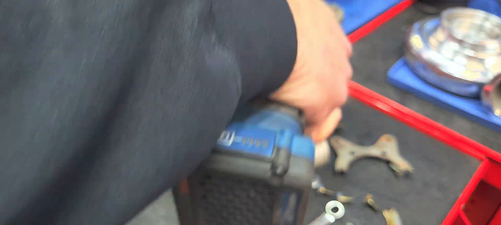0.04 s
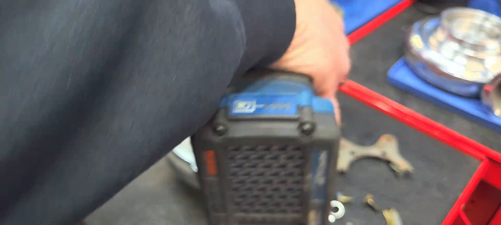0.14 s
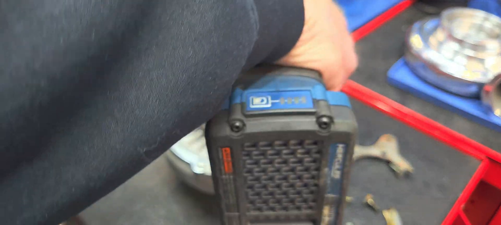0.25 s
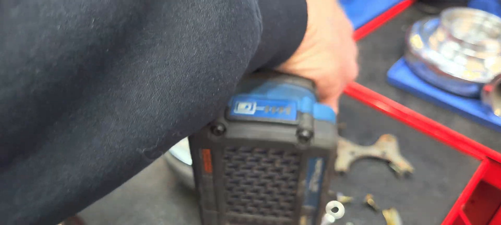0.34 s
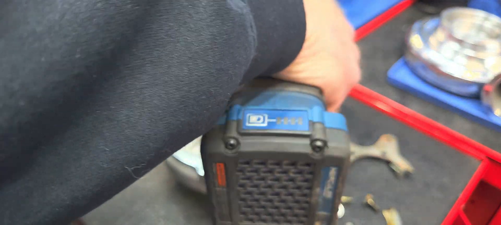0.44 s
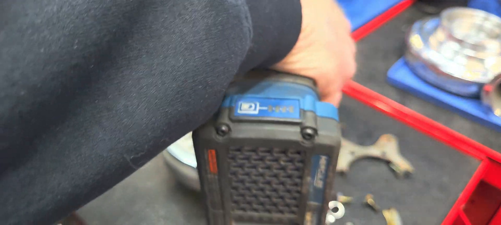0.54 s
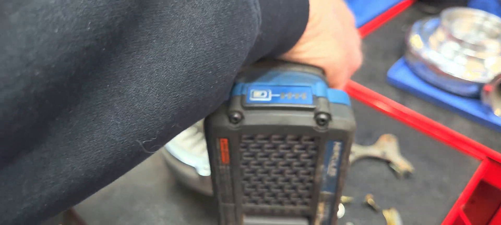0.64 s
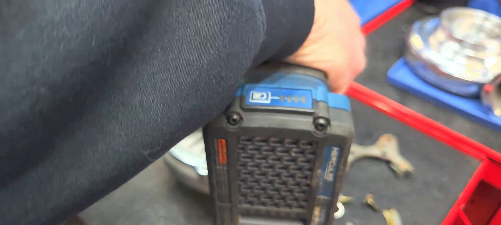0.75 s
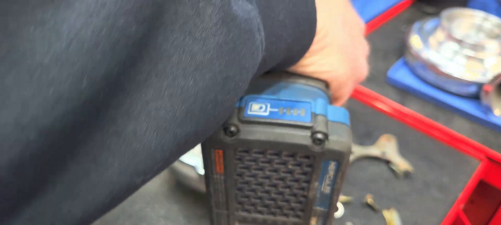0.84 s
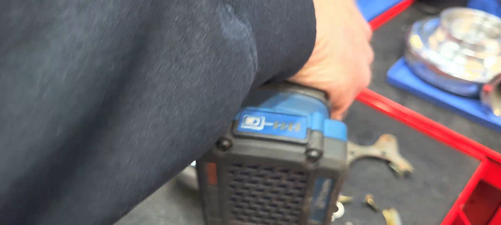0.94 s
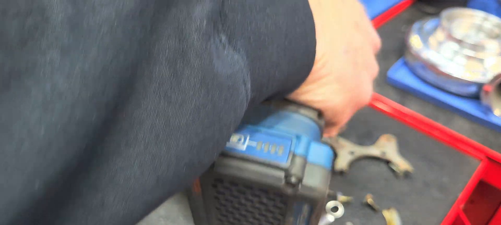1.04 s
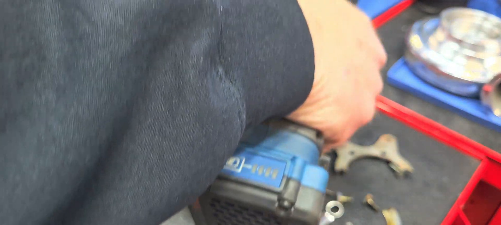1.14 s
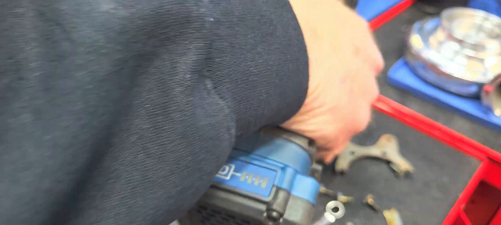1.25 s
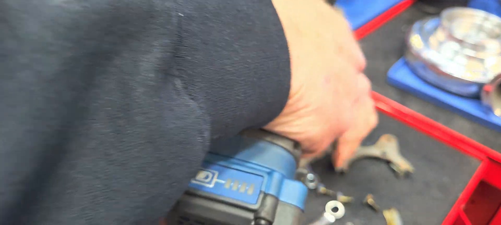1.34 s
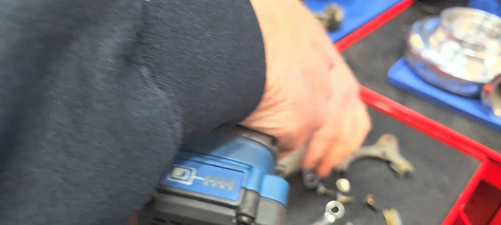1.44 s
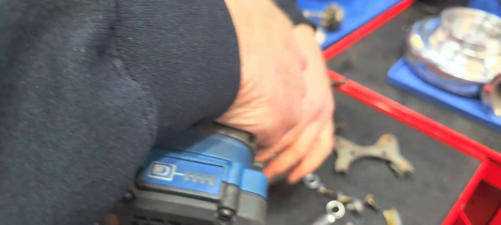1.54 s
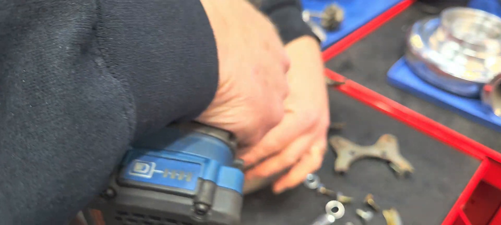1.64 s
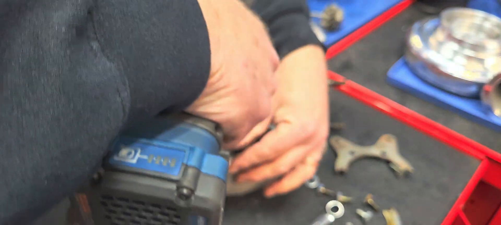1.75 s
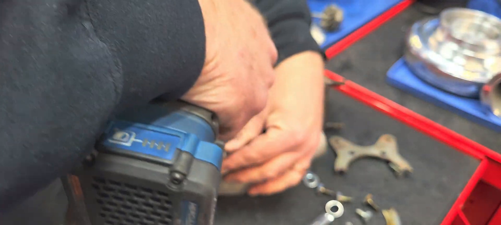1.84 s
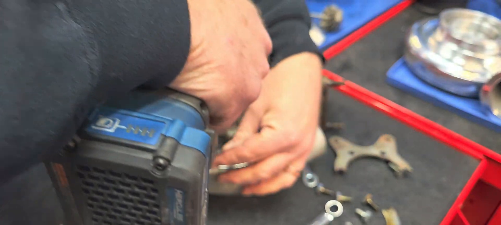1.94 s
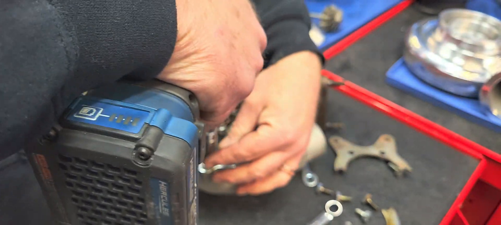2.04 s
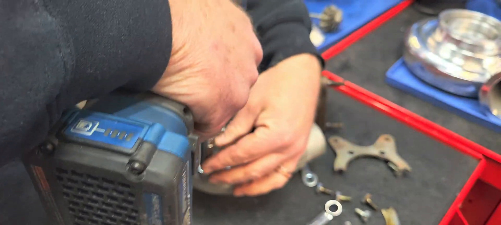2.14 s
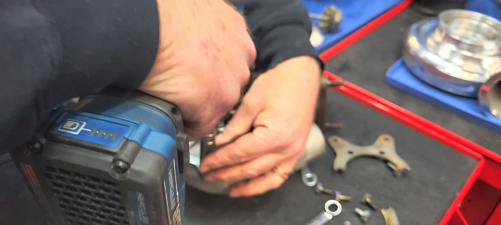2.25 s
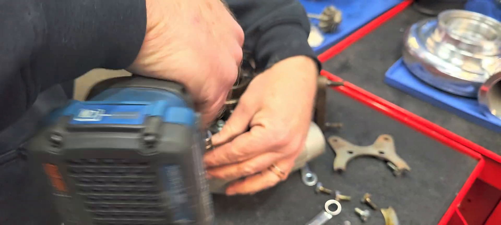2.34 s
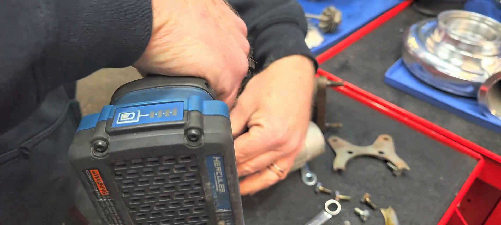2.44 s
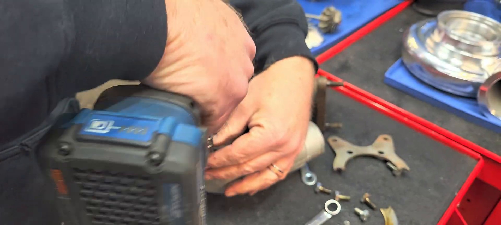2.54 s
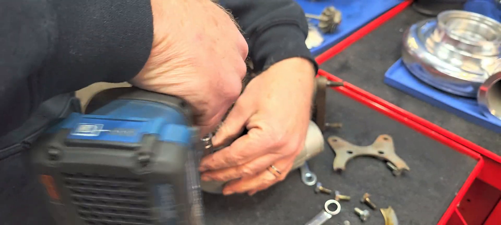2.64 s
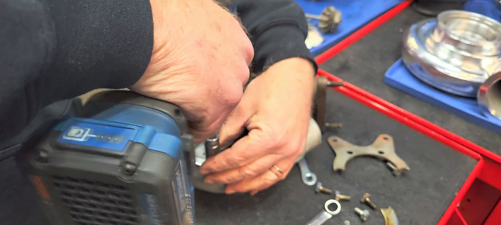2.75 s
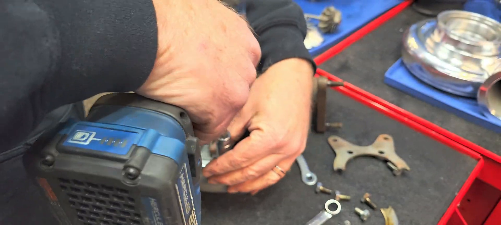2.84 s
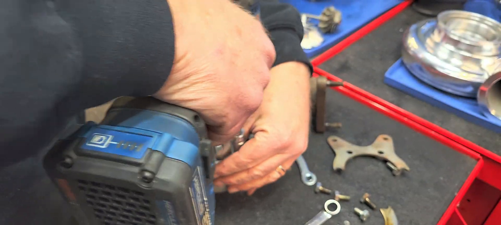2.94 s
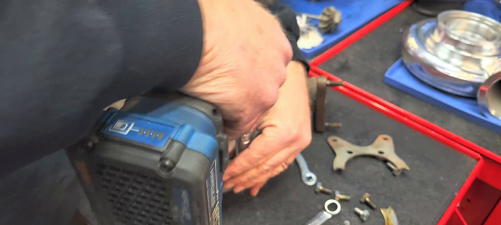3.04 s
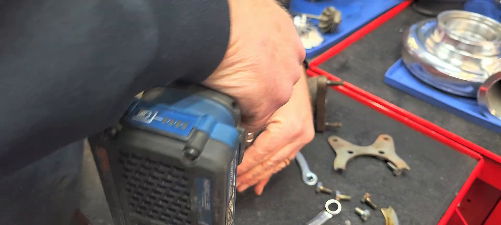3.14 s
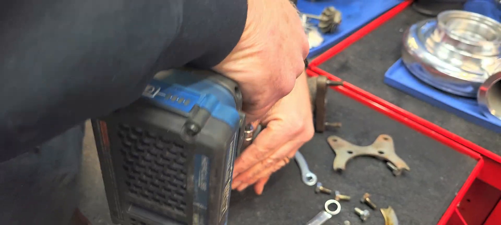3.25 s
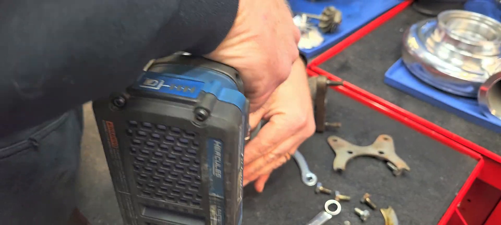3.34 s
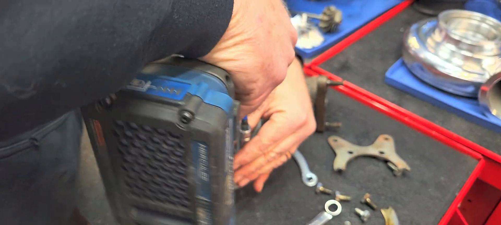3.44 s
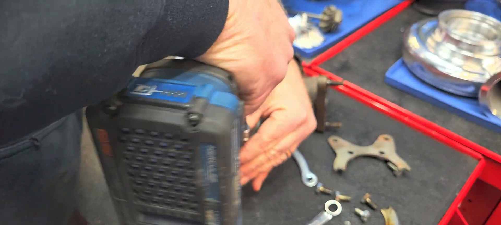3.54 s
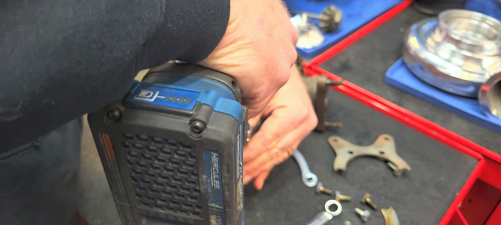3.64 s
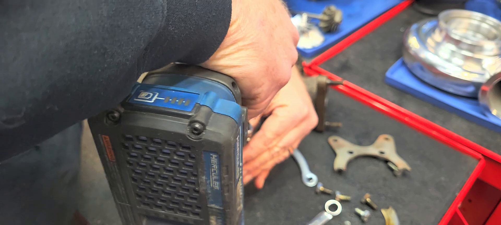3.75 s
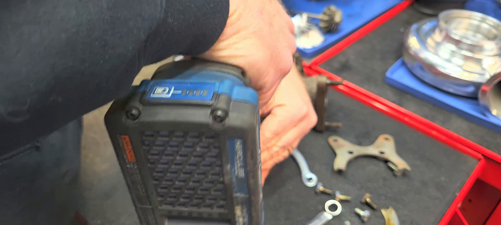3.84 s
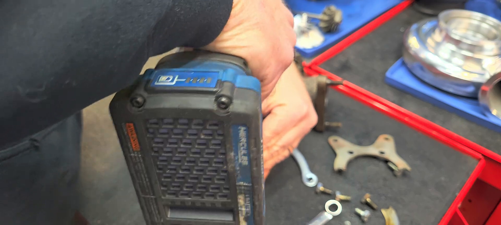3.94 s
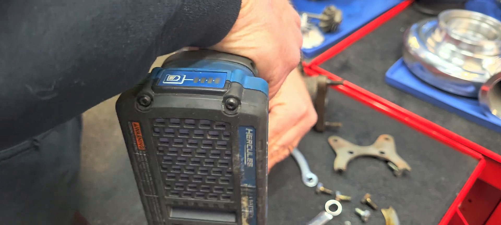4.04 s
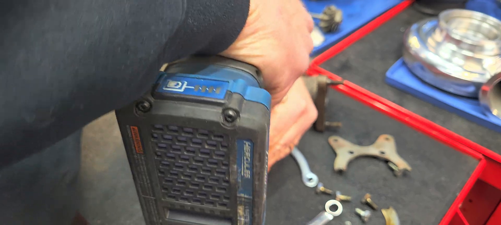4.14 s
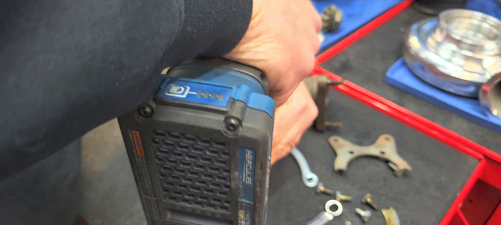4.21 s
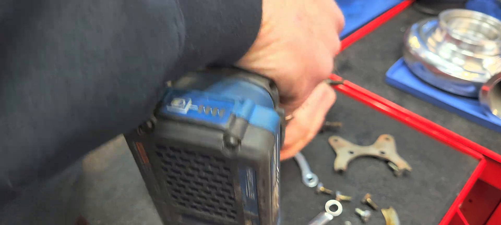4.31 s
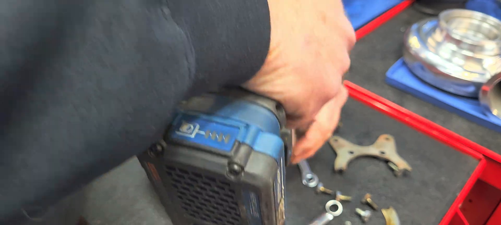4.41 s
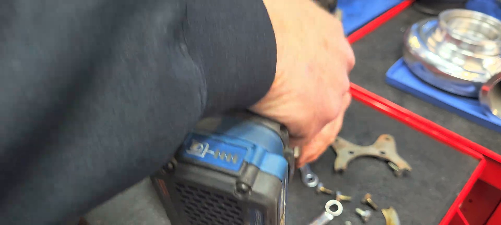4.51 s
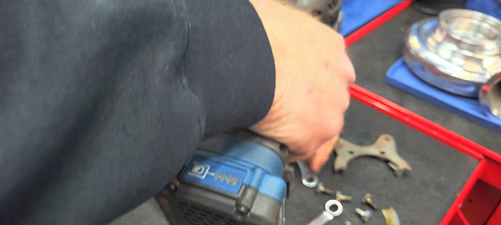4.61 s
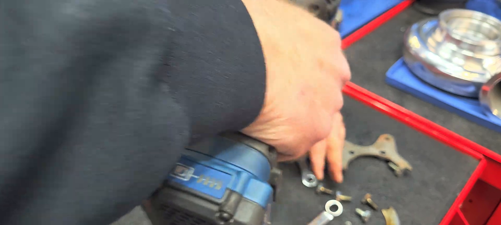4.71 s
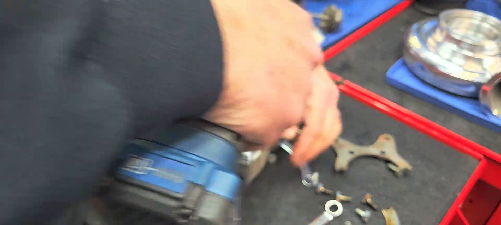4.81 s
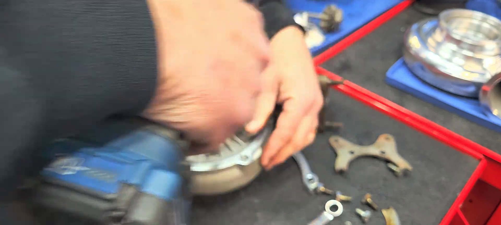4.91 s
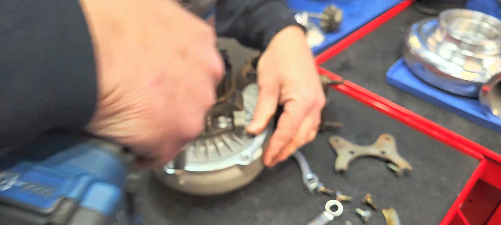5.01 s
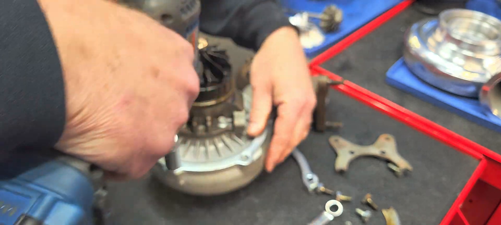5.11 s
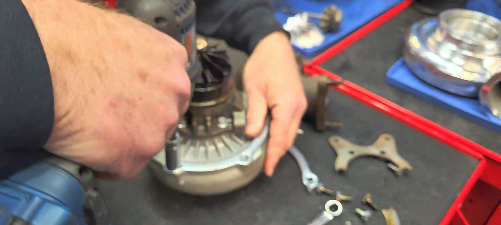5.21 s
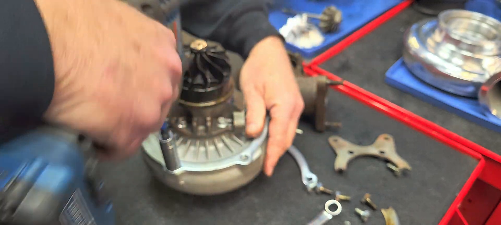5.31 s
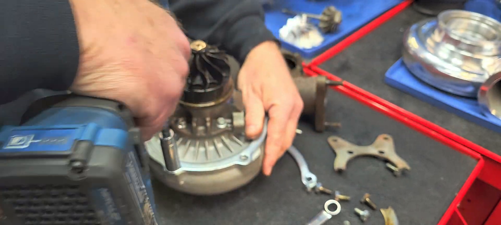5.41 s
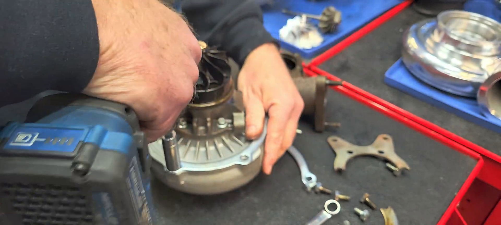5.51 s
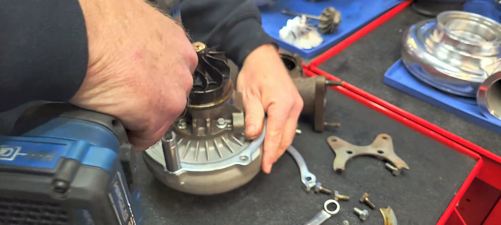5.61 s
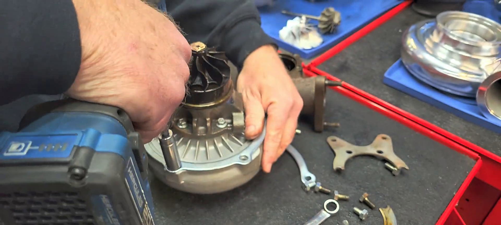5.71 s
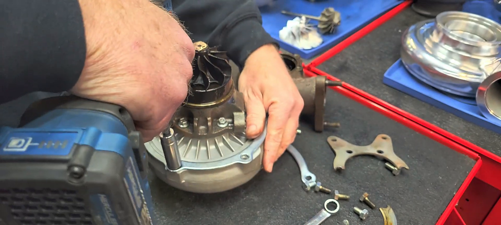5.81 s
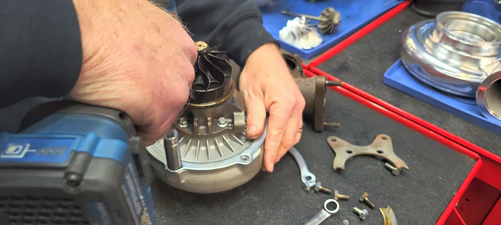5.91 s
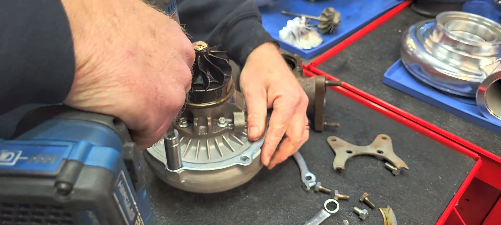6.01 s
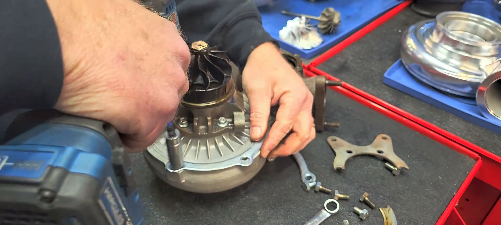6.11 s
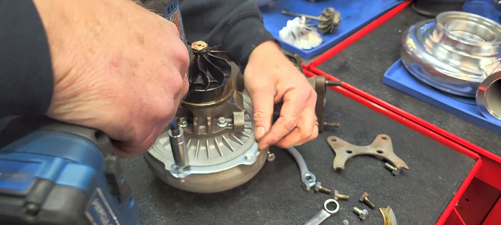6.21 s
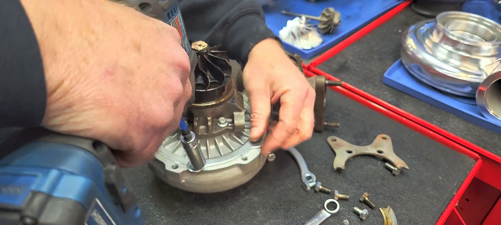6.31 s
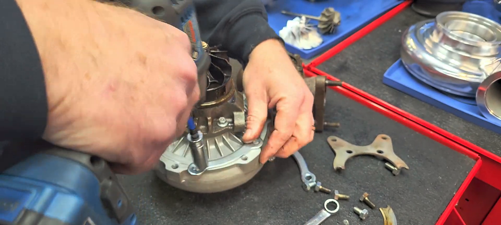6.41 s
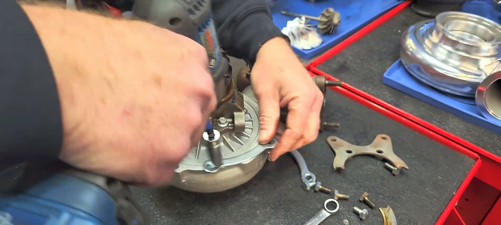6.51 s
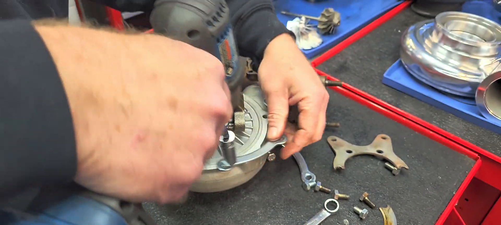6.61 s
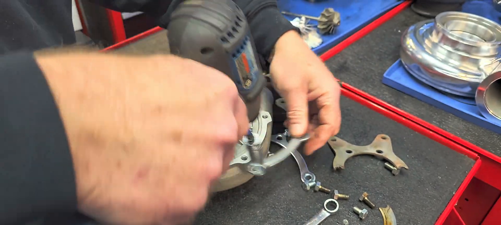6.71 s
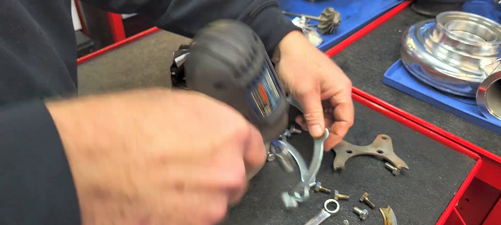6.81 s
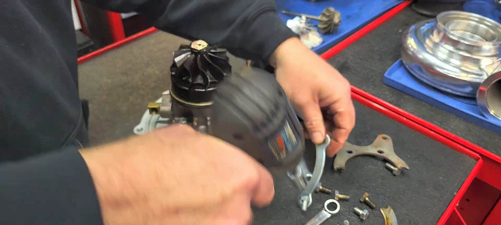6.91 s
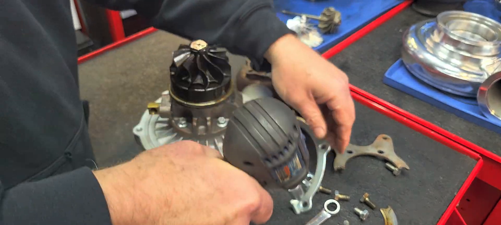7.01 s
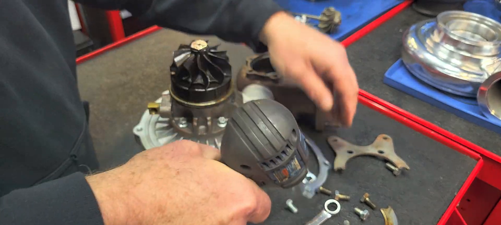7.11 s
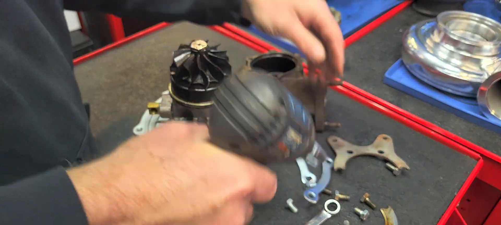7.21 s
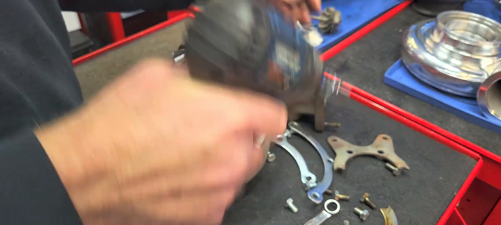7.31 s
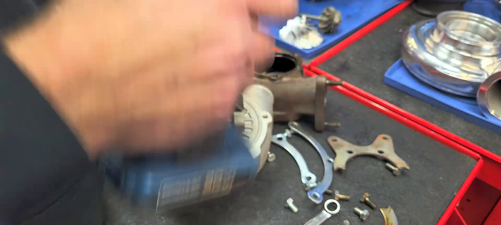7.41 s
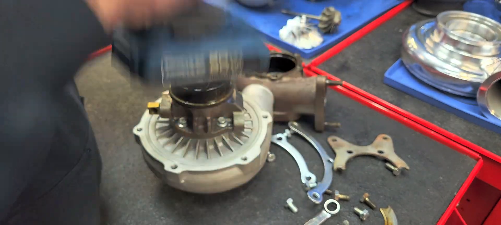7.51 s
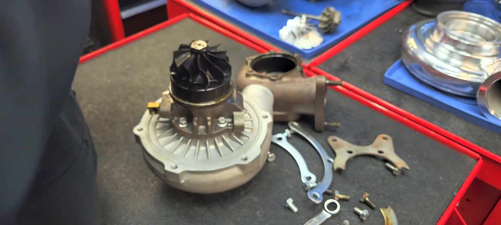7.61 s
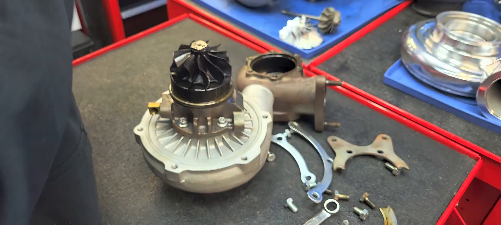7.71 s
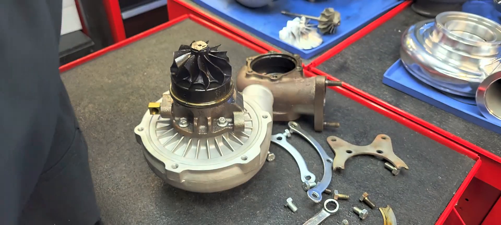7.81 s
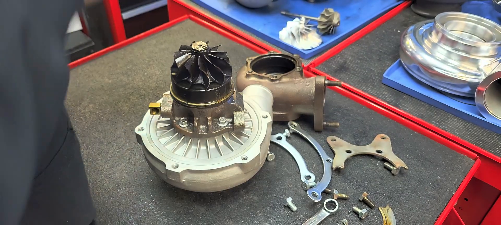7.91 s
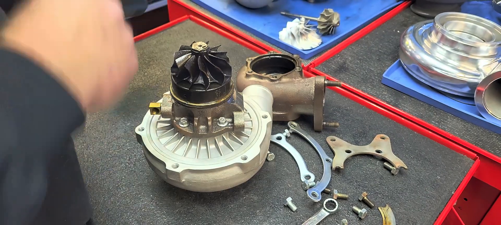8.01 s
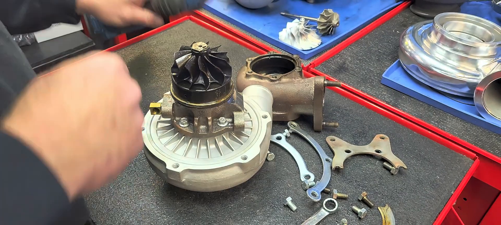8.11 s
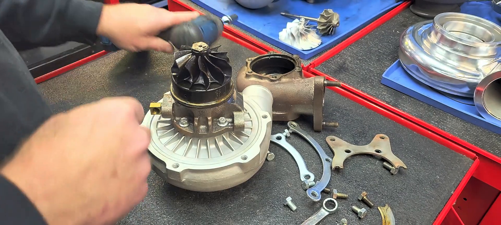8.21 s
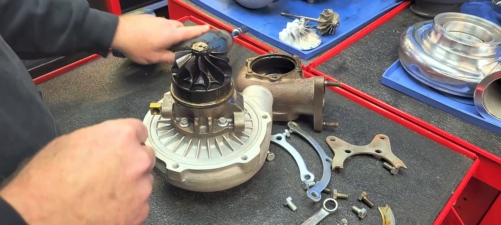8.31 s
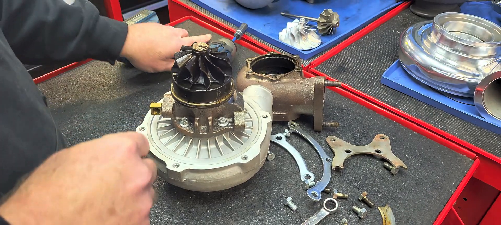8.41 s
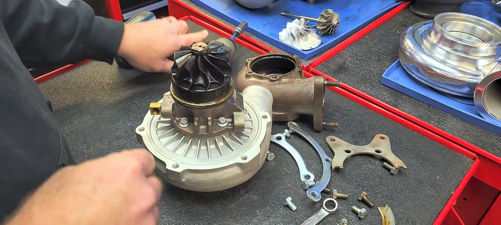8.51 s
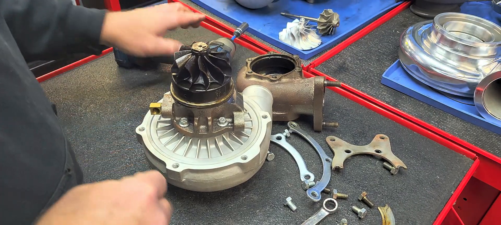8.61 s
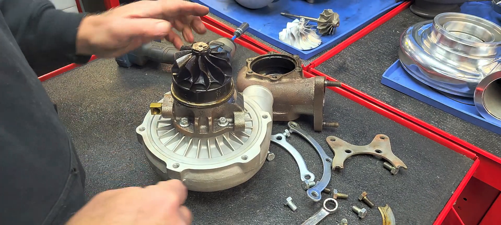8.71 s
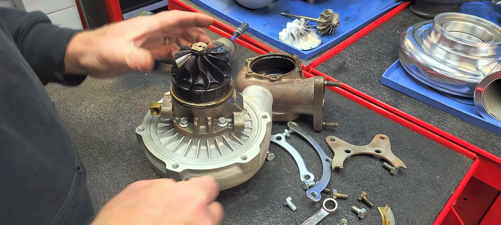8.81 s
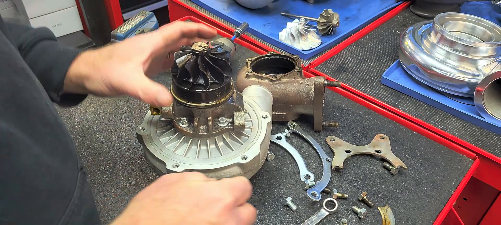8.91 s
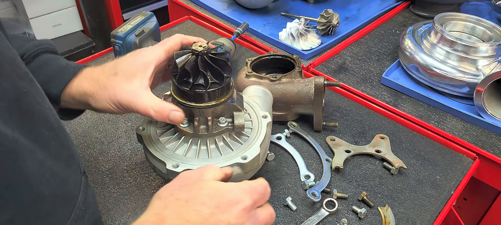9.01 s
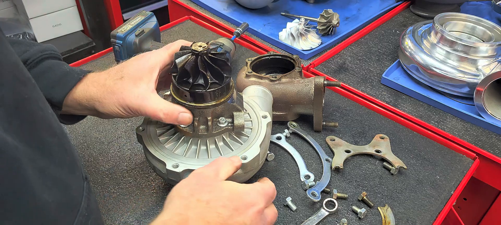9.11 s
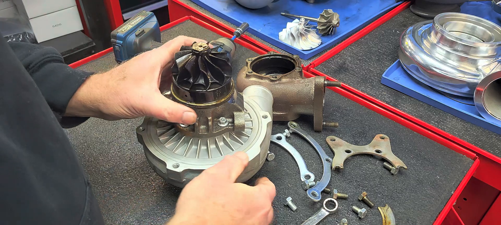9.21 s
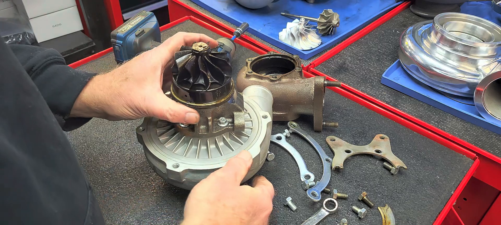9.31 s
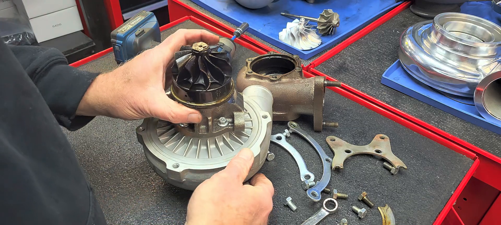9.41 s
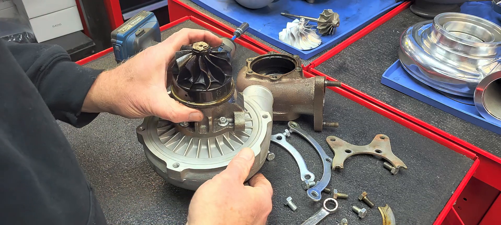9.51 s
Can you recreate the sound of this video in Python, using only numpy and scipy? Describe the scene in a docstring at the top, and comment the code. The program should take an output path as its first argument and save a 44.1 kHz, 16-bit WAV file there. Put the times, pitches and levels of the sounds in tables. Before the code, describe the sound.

Close stereo pickup at a padded workbench, with low humming workshop air and a short diffuse echo. At 0 s thin steel ticks and a thump, then at about 0.3 s a very short impact-wrench clatter; the motor whirs free until 0.9 s. From 1.1 to 2.6 s there are sparse clicks and knocks of socket on casting, sharper near 2.4 and 2.65. A sustained rattle of hard rapid blows runs 2.7-3.15, another 3.45-3.8 with the motor racing on to 4.2. Around 4.8-5 s a thump, plate clink and scuff, then small knocks. The last brief hammering comes at 5.6, spinning free until 6.3, as a second plate clinks and hisses. Bright plate jingles and padded thumps cluster at 6.9-7.3. Quiet follows, then faint ticks, a knock and scrape at 8.35 as the tool is laid down, soft thumps to 8.6, a low rumble near 9.1, and room air.

```python
"""Impact wrench on a padded bench

In a quiet workshop, close to a phone with two microphone ports, a cordless impact wrench backs bolts
out of a cast housing. Bursts of short steel blows work each bolt loose; gear, fan and shaft noise follow the trigger.
Around the bursts, filtered contacts click, knock, scuff and thump, and thin clamp plates ring as sums of modes,
the tool is laid down, and a short diffuse echo and humming shop air lie behind."""
import sys
import numpy as np
from scipy import signal
from scipy.fft import rfft, irfft, next_fast_len
from scipy.io import wavfile
from scipy.ndimage import uniform_filter1d

SR = 44100
rng = np.random.default_rng(int(sys.argv[2]) if len(sys.argv) > 2 else 0)


def transcribe(signal):
    """Save signal, clipped to [-1, 1], as a 16-bit WAV file at the path in sys.argv[1]."""
    frames = np.atleast_2d(signal).T
    limited = np.clip(frames, -1, 1)
    pcm = np.round(limited * 32767).astype(np.int16)
    wavfile.write(sys.argv[1], SR, pcm)


N = 421155  # length [samples]


def undb(db):
    """Decibels to gain."""
    return 10 ** (np.asarray(db) / 20)


def shape(x, table, share=1):
    """Colour a sound by a share of (frequency [Hz], level [dB]) points, straight over log frequency."""
    hz, db = np.transpose(table)
    size = next_fast_len(x.shape[-1])
    f = np.maximum(np.arange(size // 2 + 1) * SR / size, 1)
    gain = undb(share * np.interp(np.log(f), np.log(hz), db))
    return irfft(rfft(x, size) * gain, size)[..., :x.shape[-1]]


def unit(x):
    """Scale to rms 1."""
    return x / np.sqrt(np.mean(x ** 2))


def walk(rate):
    """Random levels held 1 / rate s and slewed twice."""
    hold = int(SR / rate)
    steps = np.repeat(rng.standard_normal(N // hold + 1), hold)
    return uniform_filter1d(uniform_filter1d(steps, hold), hold)[:N]


def pair(alike, size=N):
    """Two noises, left and right, that share a part of their power."""
    mid, left, right = rng.standard_normal((3, size))
    alike = np.clip(alike, 0, 1)
    return np.sqrt(alike) * mid + np.sqrt(1 - alike) * np.array([left, right])


def add(out, s, sound, db, pan_db):
    """Lay a two-channel sound in at s, scaled by the peak of its centre or half its louder side's peak."""
    i = int(s * SR)
    peak = max(np.abs(sound.mean(axis=0)).max(), .5 * np.abs(sound).max())
    sound = sound[:, :N - i] * undb(db) / peak
    out[:, i:i + sound.shape[1]] += sound * undb(np.array([[pan_db], [-pan_db]]) / 2)


def ring(modes, scatter_db, detune, push_s):
    """One blow on a body: each decaying mode gets its own strength and tuning."""
    hz, db, t60 = np.transpose(modes)[:, :, None]
    t = np.arange(int(SR * t60.max())) / SR
    strength, offset, start, lag = rng.standard_normal((4, len(hz), 1))
    size = undb(db + scatter_db * strength - 60 * t / t60) * (1 - np.exp(-t / push_s))
    phase = 2 * np.pi * hz * (1 + detune * offset) * t + start
    # the ports hear a mode out of step, more so toward 2 kHz
    step = lag * np.minimum(hz / 2000, 1) ** 0.32
    left = (size * np.sin(phase + step)).sum(axis=0)
    right = (size * np.sin(phase - step)).sum(axis=0)
    return np.array([left, right])


def burst(t60, rise_s, alike):
    """A fast-fading noise spray of tiny contacts."""
    t = np.arange(int(SR * t60)) / SR
    return pair(alike, size=len(t)) * undb(-60 * t / t60) * (1 - np.exp(-t / rise_s)) ** 2


def crack(lo_hz, t60, rise_s):
    """A bright scrape or tick: a noise burst above lo_hz."""
    highpass = signal.butter(4, lo_hz, "high", fs=SR, output="sos")
    return signal.sosfilt(highpass, burst(t60, rise_s, .5))


SWELL_DB = -20  # level one rise before or one fall after the loudest moment [dB]


def swell(s, rise_s, fall_s, db):
    """Gain that climbs to db at s and dies away, straight in dB."""
    t = np.arange(N) / SR - s
    return undb(np.maximum(db + SWELL_DB * np.maximum(-t / rise_s, t / fall_s), -200))


# Colour of the workshop air: (frequency [Hz], density before scaling to rms 1 [dB])
SHOP_AIR = [(35, -28.5), (60, 2.5), (287, -20.5), (346, -26.5), (469, -37.5), (682, -32), (767, -38),
            (862, -33.5), (2650, -43.5), (6000, -56.5), (13000, -62), (16000, -68)]
# Distant machinery, before a 1 dB lift and wavering: (frequency [Hz], level [dB])
MACHINERY_HUM = [(344.5, -81), (414.5, -87), (516.8, -85), (689.1, -82), (861.3, -87), (1319, -91.5)]
# Hands and the tool jolting the phone's support: (loudest time [s], rise [s], fall [s], rumble level [dB])
JOLTS = [(7.4, .12, 0.38, -47), (8.62, 0.11, .35, -45.5), (9.09, 0.044, 0.34, -46.5)]
SHOP_AIR_DB = -57
RUMBLE_DB, RUMBLE_UNDER_SHAKE_DB, BOOM_DB = -67, -8.5, -63.5


def shop():
    """Wavering air, hum and bench boom; slow rumble rises while the tool is loaded or hands jolt the support."""
    t = np.arange(N) / SR
    air = unit(shape(pair(0.67), SHOP_AIR)) * undb(SHOP_AIR_DB + 1.5 * walk(6.7))
    *_, load, shake_db = trigger()
    hum = 0
    for hz, db in MACHINERY_HUM:
        hum = hum + undb(db + 1.0 + 3.5 * walk(15)) * np.sin(2 * np.pi * hz * t)
    low_band = signal.butter(2, [22, 58], "band", fs=SR, output="sos")
    rumble = unit(signal.sosfilt(low_band, pair(1.0)))
    jolted = sum(swell(*jolt) for jolt in JOLTS)
    shaken = undb(RUMBLE_DB) + load * undb(shake_db + RUMBLE_UNDER_SHAKE_DB) + jolted
    # the bench modes, here as a noise colour with sloping ends
    boom_colour = [(49.3, -18.5)] + [(hz, db) for hz, db, _ in BENCH_MODES] + [(820, -36)]
    boom = unit(shape(pair(.85), boom_colour)) * undb(BOOM_DB + 4.4 * walk(8.6))
    return air + hum + rumble * shaken + boom


# Clamp plates touching steel, the first and then the second plate:
# (time [s], reference level [dB], left minus right [dB], low modes relative to the reference before a 6 dB cut [dB])
FIRST_PLATE_HITS = [(0.0, -19.5, -6.5, -6.5), (0.0174, -12, -17, -9), (0.0585, -12.5, -5.5, -11.5),
                    (4.8372, -16.5, -7, -16), (4.8597, -29, -29, -30), (4.9828, -24.5, 0, -16)]
SECOND_PLATE_HITS = [(6.1938, -19, 9, -1), (6.2494, -19.5, 19, -2), (6.314, -14.5, 1, -7),
                     (6.465, -38, 2, -16), (6.647, -46, 0, 6), (6.72, -39, 2, -3),
                     (6.9396, -31, -14, -20.5), (6.9498, -23.5, 2.5, -12), (6.9644, -37.5, -8, -13),
                     (7.013, -14.5, -2, -15), (7.1104, -27, -12, -19.5), (7.1197, -14, -5, -17),
                     (7.1346, -16, 10.5, -10), (7.1643, -11.5, -17.5, -21), (7.1994, -20.5, -12, -14.5),
                     (7.2704, -8.5, -2.5, -27.5), (7.2994, -43, -19, -24)]
# Bending modes of each plate: (frequency [Hz], relative level [dB], time to fall 60 dB [s])
FIRST_PLATE_MODES = [(3985, -33, .12), (4630, -32, .11), (5490, -30, .12), (6196, -33, .1),
                     (7205, -19, .16), (8000, -30, .16), (9515, -10, .13), (10060, -26, .18),
                     (11720, -20, .15), (12020, 0, .13), (12220, -11, .14), (13590, -30, .12),
                     (14985, -11, .15), (15295, -6, .12)]
SECOND_PLATE_MODES = [(2750, -38, .17), (3450, -39, .12), (4425, -30, .12), (5405, -31, .12),
                      (7047, -23, .12), (7994, -38, .12), (9351, -10, .13), (9900, -28, .12),
                      (11780, 0, .12), (11830, -12, .2), (12220, -12, .1), (12550, -25, .1),
                      (13570, -38, .15), (14860, -14, .2), (15180, -16, .14)]


def plates():
    """Thin steel plates tick and ring; where they are struck sets how much the low bending modes sound."""
    out = np.zeros((2, N))
    for hits, table in ((FIRST_PLATE_HITS, FIRST_PLATE_MODES), (SECOND_PLATE_HITS, SECOND_PLATE_MODES)):
        modes = np.array(table)
        low = modes[:, 0] < 8500
        for s, db, pan_db, low_db in hits:
            add(out, s, ring(modes[~low], 3, .0008, .001), db - 3, pan_db)
            add(out, s, ring(modes[low], 3, .002, .0005), db + low_db - 6, pan_db / 2)
            add(out, s, crack(2400, 0.007, 0.00019), db - 12.5, pan_db)
    return out


# Trigger clicks, and socket and parts knocking on housing and bench: (time [s], body peak [dB],
# note over body [dB], treble over body [dB], thump over body [dB], note [Hz])
CLICKS_AND_KNOCKS = [(0.008, -29, -8.5, 12.5, -4.5, 5450), (0.054, -27.5, -4, -3, 2.5, 5440),
                     (0.19, -47.5, 0.5, 2, -7.5, 3190), (0.272, -39, -0.5, -9, -10.5, 5260),
                     (1.122, -47.5, -8, -6, -21, 3030), (1.142, -52, -6, -24, -16, 3020),
                     (1.396, -54.5, 17, -10, -11, 4350), (1.471, -28.5, -43, -47, 0.5, 2900),
                     (1.501, -46, -23, 8, 13.5, 4680), (1.617, -30.5, 4.5, -22, -10, 4030),
                     (1.641, -39, -2, 3, -8, 4420), (1.715, -27, 0.5, -1, -17, 4220),
                     (1.976, -38, -5, -16.5, -23, 4430), (2.13, -37, 2, -18.5, -11, 4160),
                     (2.151, -36.5, 0, -0.5, -3.5, 3690), (2.344, -36, 0, -5, -13, 2940),
                     (2.368, -20, 4.5, -6, -18.5, 3980), (2.533, -36.5, -1, 0.5, -12.5, 3110),
                     (2.646, -21.5, 0.5, -6, -16, 3200), (3.459, -25, -1.5, 7, -9, 3290),
                     (4.218, -31, -5.5, 14, -10, 3097), (4.769, -37.5, -15, -9, 13, 3120),
                     (4.853, -40.5, -17, 4, 2, 4000), (5.133, -29, 1, -26, -22, 3340),
                     (5.165, -30, -15, -21, -21, 3380), (5.175, -37, 6.5, -2, -13.5, 3350),
                     (5.209, -26.5, 2.5, -24, -16.5, 3560), (5.346, -45.5, -4, -16, -7.5, 4780),
                     (5.435, -40.5, -11, -16, -12.5, 3560), (5.453, -33.5, -9, -1, -18.5, 3460),
                     (5.461, -36.5, 1, -4, -4.5, 3376), (5.55, -28.5, -2, -3.5, -22, 3300),
                     (6.227, -34.5, 3, 22, -24, 3400), (6.463, -51, 4, 0, -17, 3430),
                     (6.513, -47, 13, -9, -16, 4480), (6.645, -46, 11, 18, -17, 4950),
                     (6.72, -49.5, 9.5, 20, -20, 3423), (6.742, -48, 1, 1, -13, 5330),
                     (6.771, -57, 15.5, 20, -5, 5300), (6.895, -33, -42, -36, 4, 2970),
                     (7.112, -39, 2, 22.5, 8.5, 4422), (7.134, -31, -8.5, 16.5, 4.5, 5500),
                     (7.801, -52, -5.5, -6, -1.5, 4410), (7.875, -43, -2.5, 5.5, -20.5, 4260),
                     (7.935, -50.5, -1, 6, -16, 4570), (8.205, -51, -22, -13, -10.5, 3100),
                     (8.254, -36, -6, -1.5, 7, 3100), (8.345, -27, 10.5, 3, -9, 3540),
                     (8.509, -36.5, -6, -7, -2, 3180)]
# Body of the casting: (frequency [Hz], relative level [dB])
HOUSING = [(250, -23), (600, -14), (1000, -2), (1280, 5), (1600, -0.5), (2300, -9), (4000, -32.5)]
# A part thudding on the padded top: (frequency [Hz], relative level [dB], time to fall 60 dB [s])
THUD_MODES = [(90, -3, 0.13), (162, -3, 0.2), (208, -8, 0.096), (273, -5.5, 0.062), (336, -0.5, 0.028),
              (413, -3, 0.0089), (475, -4, 0.033), (660, -8, 0.031)]
KNOCK_PAN_DB = 1.5  # left minus right
TICK_DB = -7.5  # broad tick under the note


def clicks_and_knocks():
    """The trigger clicks, socket and parts knock: a short clack, one broad note, bright ticks and a thud."""
    out, pan_db = np.zeros((2, N)), KNOCK_PAN_DB
    for s, db, high_db, top_db, thump_db, note_hz in CLICKS_AND_KNOCKS:
        resonance = signal.iirpeak(note_hz, 7.5, fs=SR)
        note = signal.lfilter(*resonance, burst(.02, .0002, .6))
        body = shape(burst(.018, .0003, .7), HOUSING)
        add(out, s, body, db, pan_db)
        add(out, s, note, db + high_db, pan_db)
        add(out, s, crack(1700, 0.0024, 0.0006), db + high_db + TICK_DB, pan_db)
        add(out, s, crack(7000, 0.038, 0.00013), db + top_db, pan_db)
        add(out, s, ring(THUD_MODES, 3, .05, .0015), db + thump_db, 0)
    return out


# Soft weight settling on the padded top: (time [s], peak [dB])
THUMPS = [(0.014, -31.5), (1.474, -38), (4.771, -30.5), (4.8, -33), (6.897, -34), (7.167, -29),
          (7.208, -32.5), (7.266, -28.5), (8.284, -33), (8.472, -32), (8.509, -36.5), (8.558, -35)]
# Bench: (frequency [Hz], relative level [dB], time to fall 60 dB [s])
BENCH_MODES = [(89.9, -0.5, 0.51), (118.9, -1.5, 0.48), (164, -1.5, 0.22), (205, 7, 0.074),
               (258, -4.5, 0.12), (354.2, -6.5, 0.18), (440, -16, 0.043), (550, -12, 0.023)]


def thumps():
    """Slow, padded contacts move only the bench modes."""
    out = np.zeros((2, N))
    for s, db in THUMPS:
        add(out, s, ring(BENCH_MODES, 5.9, 0.046, 0.0036), db, 0)
    return out


# Parts sliding or rattling and cloth rustling:
# (loudest time [s], rise [s], fall [s], rub level [dB], hiss over rub [dB])
SCUFFS = [(.2, 0.032, 0.18, -59, -4.5), (2.58, .2, 0.099, -58, -5.5), (4.82, 0.056, 0.14, -57, -1),
          (4.97, 0.025, 0.036, -66.5, -4), (5.55, .25, .03, -59.5, -9), (6.205, 0.06, 0.097, -49, 20.5),
          (6.315, 0.17, 0.024, -51, 18), (6.45, 0.027, 0.27, -59, 0.5), (6.719, 0.46, 0.097, -60.5, -20),
          (7.8, 0.25, 0.31, -67, 3.5), (8.355, .005, 0.16, -35.5, -14.5), (8.47, 0.3, 0.18, -50, -41.5)]
# Bench top under a sliding part: (frequency [Hz], density before scaling to rms 1 [dB])
RUB = [(240, -38), (400, -10.5), (682, -13), (1120, -5), (1210, 0), (1630, -12), (1840, -8.5),
       (2640, -18.5), (3170, -11.5), (5860, -27), (9000, -30), (11700, -62.5), (19800, -120)]


def scuffs():
    """Sliding parts rub in uneven grains; rattling parts and rustling cloth add a hiss of the fan's colour."""
    grain = undb(1.0 * walk(210))
    rub = unit(shape(grain * pair(0.14), RUB))
    hiss = unit(shape(grain * pair(0.18), FAN))
    out = 0
    for s, rise_s, fall_s, db, hiss_db in SCUFFS:
        out = out + swell(s, rise_s, fall_s, db) * (rub + undb(hiss_db) * hiss)
    return out


# Trigger pulls: (full load [s], steady blows from [s], bolt loose [s], trigger off [s],
# gears under load [dB], fan under load [dB], gears just free [dB], gears at the end [dB],
# fan just free [dB], fan at the end [dB], bench shake under load [dB], anvil ring at the last blow over the blow [dB])
PULLS = [(0.34, .373, 0.4, 0.91, -27, -20.5, -37.5, -36, -36.5, -34, -48, -11),
         (2.687, 2.765, 3.148, 3.148, -26, -26.5, -40, -40, -40, -40, -36, -20),
         (3.484, 3.53, 3.79, 4.225, -30, -25, -43.5, -34.5, -47, -30.5, -34, -4),
         (5.596, 5.683, 5.692, 6.322, -28.5, -22, -38.5, -34.5, -35.5, -29, -42, -8)]
# gears: rise from rest, overshoot, droop under load
SPIN_UP_S, SPIN_UP_DB, FIRST_BITE_DB, SAG_DB = 0.085, -38.5, 5, -5
# the fan comes late and overshoots
FAN_LAG_S, FAN_EARLY_DB, FAN_SURGE_DB, FAN_SETTLE_S = 0.082, -8, 4.5, 0.031
UNLOAD_S, FREE_SHAKE_DB = .05, -52
BRAKE_S, BRAKE_DB = .065, -32


def trigger():
    """Levels of gears and fan in dB, the load 0-1 and the shake in dB, from the trigger pulls."""
    t = np.arange(N) / SR
    gear, fan, load, shake = np.full((4, N), -150.)
    for full, _, loose, off, gear_db, fan_db, *free_db, shake_db, _ in PULLS:
        runs = off > loose + UNLOAD_S  # the motor spins on after the bolt is loose
        if runs:
            free_s = [loose + UNLOAD_S, off]
            gear_free, gear_end, fan_free, fan_end = free_db
        else:
            free_s = []
            gear_free = gear_end = gear_db + SAG_DB
            fan_free = fan_end = fan_db
        lag, rest, edge = full + FAN_LAG_S, full - SPIN_UP_S, .03
        stop_s = [off + BRAKE_S, off + BRAKE_S + edge]
        gear_s = [rest - edge, rest, full, lag, loose] + free_s + stop_s
        gear_pts = [-150, gear_db + SPIN_UP_DB, gear_db + FIRST_BITE_DB, gear_db, gear_db + SAG_DB]
        gear_pts += [gear_free, gear_end][:len(free_s)] + [gear_end + BRAKE_DB, -150]
        fan_s = gear_s[:4] + [min(lag + FAN_SETTLE_S, loose)] + gear_s[4:]
        fan_pts = [-150, fan_db + SPIN_UP_DB + FAN_EARLY_DB, fan_db + FAN_EARLY_DB]
        fan_pts += [fan_db + FAN_SURGE_DB, fan_db, fan_db]
        fan_pts += [fan_free, fan_end][:len(free_s)] + [fan_end + BRAKE_DB, -150]
        gear = np.maximum(gear, np.interp(t, gear_s, gear_pts))
        fan = np.maximum(fan, np.interp(t, fan_s, fan_pts))
        held = np.interp(t, [rest, full, loose, loose + UNLOAD_S], [0, 1, 1, 0])
        load = np.maximum(load, held)
        shake = np.maximum(shake, FREE_SHAKE_DB + held * (shake_db - FREE_SHAKE_DB))
    return gear, fan, load, shake


# Noise colours of free gears, loaded gears, fan and bench shake:
# (frequency [Hz], density before scaling [dB])
GEARS = [(240, -44.5), (400, -19), (486, -11), (631, -14.5), (710, -4.5), (885, -10.5), (1470, -0.5),
         (2070, -9), (2350, -1), (2580, -6.5), (3090, -0.5), (5860, -5), (9000, -9.5), (11700, -35.5),
         (19800, -120)]
STRAIN = [(240, -30), (400, -9.5), (748, -16), (957, -3.5), (1340, 3.5), (1860, -3.5), (2580, -5.5),
          (3220, 1), (4690, -2), (5340, -1.5), (5930, -7), (9000, -6), (11700, -33), (19800, -120)]
FAN = [(4710, -33), (8000, -10.5), (11000, -7.5), (12800, -1), (14100, -3), (14800, -3.5), (15900, -18),
       (16400, -20)]
SHAKE = [(18, -30), (30, -20), (86, 0), (140, -4), (183, 0.5), (254, -3.5), (357, -6.5), (441, -10),
         (700, -9), (910, -45.5), (1540, -120)]
# Shaft orders, before WHINE_DB and flicker: (multiple of the shaft rate, level [dB])
WHINE = [(2, -61), (3, -57), (6, -58), (10, -56), (12, -53), (13, -57), (20, -58), (30, -55), (50, -54)]
SHAFT_HZ, WHINE_DB = 242.3, -1
SLOWED_SHARE, SPEED_UP_S = .12, .06  # share of speed lost under load; time constant of slowing and recovery


def motor():
    """Gear teeth chatter in uneven grains, the fan hisses once a turn, shaft orders whine, the bench shakes."""
    gear_db, fan_db, load, shake_db = trigger()
    inertia = int(SPEED_UP_S * SR)
    slowed = signal.lfilter([1 / inertia], [1, 1 / inertia - 1], load)
    turns = np.cumsum(SHAFT_HZ * (1 + .004 * walk(12) - SLOWED_SHARE * slowed)) / SR
    chatter = undb(3 * walk(400) + 1.5 * walk(60))
    teeth = chatter * pair(0.65)
    gears = (1 - load) * unit(shape(teeth, GEARS)) + load * unit(shape(teeth, STRAIN))
    once_a_turn = 1 + 0.35 * np.cos(2 * np.pi * turns)
    fan = unit(shape(chatter * once_a_turn * pair(0.13), FAN))
    shake = unit(shape(pair(.5), SHAKE)) * undb(4 * walk(14))
    whine = sum(undb(db + 3 * walk(25)) * np.sin(2 * np.pi * order * turns) for order, db in WHINE)
    # whine and shake stop growing once the gears reach -40 dB
    spinning = undb(np.minimum(gear_db + 40, 0))
    tool = undb(gear_db) * gears + undb(fan_db) * fan + spinning * undb(WHINE_DB) * whine
    return tool * undb(np.array([[.7], [-.7]])) + spinning * undb(shake_db) * shake


# Anvil: (frequency [Hz], relative level [dB], time to fall 60 dB [s])
ANVIL_MODES = [(7150, -3, .016), (7300, 0, .016)]
BLOW_PERIOD_S, BLOW_JITTER_S = .0228, .0008
SKIP_PERIOD_S, SKIP_LEAD_S = .015, .03  # quicker blows while the socket seats
BLOW_DB, BLOW_TREBLE_DB, BLOW_THUMP_DB, BLOW_SCATTER_DB = -10.5, -9, -34.5, 2
FIRST_ANVIL_DB = -16.5  # anvil over the blow at full load
BLOWS_GROW_DB_PER_S, BRIGHTEN_DB_PER_S, BRIGHT_AFTER_S = 250.5, 200, .04  # the first blows are weak and dull


def hammer():
    """Each blow is a few ms of scraping steel, a short ring of the anvil and a thump through the bench."""
    out = np.zeros((2, N))
    for full, steady, loose, *_, last_anvil_db in PULLS:
        seating = np.arange(steady - SKIP_PERIOD_S, full - SKIP_LEAD_S, -SKIP_PERIOD_S)
        regular = np.arange(steady, loose + BLOW_PERIOD_S / 2, BLOW_PERIOD_S)
        for s in np.r_[regular, seating]:
            late, hard, bright, heavy = rng.standard_normal(4)
            grow_db = min(s - full, 0) * BLOWS_GROW_DB_PER_S
            s = s + BLOW_JITTER_S * late
            blow_db = BLOW_DB + BLOW_SCATTER_DB * hard + grow_db
            anvil_db = np.interp(s, [full, loose], [FIRST_ANVIL_DB, last_anvil_db])
            brighten_db = min(s - full - BRIGHT_AFTER_S, 0) * BRIGHTEN_DB_PER_S
            treble_db = BLOW_TREBLE_DB + BLOW_SCATTER_DB * bright + brighten_db
            # half the loaded-gear colour
            add(out, s, shape(burst(.009, .001, .5), STRAIN, .5), blow_db, 1.5)
            add(out, s, ring(ANVIL_MODES, 2, 0.0064, .0015), blow_db + anvil_db, 1.5)
            add(out, s, crack(9500, .009, .001), treble_db, -1.5)
            add(out, s, ring(BENCH_MODES, 3.0, 0.026, 0.0049), BLOW_THUMP_DB + 5.0 * heavy, 0)
    return out


# Echo bands: (centre frequency [Hz], time to fall 60 dB [s], level [dB])
ROOM = [(157, 1, -26), (500.4, 0.75, -7.5), (1420, 0.26, -5.5), (3770, 0.22, -1.5), (9700, 0.18, -2)]


def room(dry):
    """A diffuse tail of decaying noise bands, different at each port, whose treble dies first."""
    t = np.arange(int(.7 * SR)) / SR
    tail = 0
    for hz, t60, db in ROOM:
        band = signal.butter(2, [hz / 1.7, hz * 1.7], "band", fs=SR, output="sos")
        decay = undb(-60 * t / t60) * (1 - np.exp(-t / 0.0024))
        noise = signal.sosfilt(band, rng.standard_normal((2, len(t))))
        tail = tail + undb(db) * noise * decay / np.sqrt(np.sum(decay ** 2))
    return signal.fftconvolve(dry.mean(axis=0)[None], tail, axes=1)[:, :N]


def scene():
    """Everything on the bench, its echo, and the shop."""
    bench = plates() + clicks_and_knocks() + thumps() + scuffs() + motor() + hammer()
    return bench + room(bench) + shop()


# The right port faces the bench: (frequency [Hz], left minus right before 0.9 of it is applied [dB])
PORTS = [(4000, 0.5), (8000, 5.5), (13000, -8.5)]
TOP_HZ = 15750


def record(dry):
    """The two ports hear the treble unequally; the phone clips the loudest peaks and cuts the top."""
    heard = np.array([shape(dry[0], PORTS, 0.4), shape(dry[1], PORTS, -1 / 2)])
    lowpass = signal.ellip(8, .2, 70, TOP_HZ, fs=SR, output="sos")
    return signal.sosfilt(lowpass, np.clip(heard, -.85, .85))


dry = scene()
out = record(dry)
transcribe(out)
```